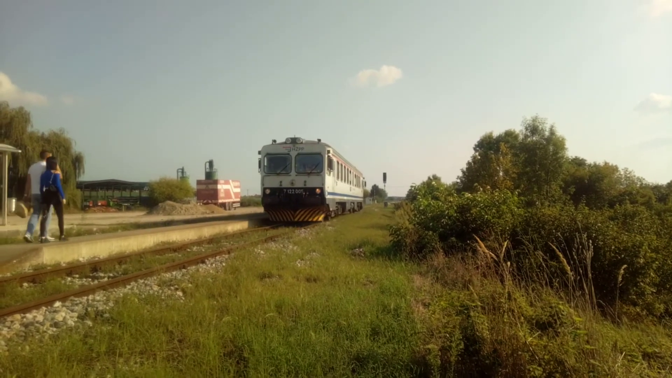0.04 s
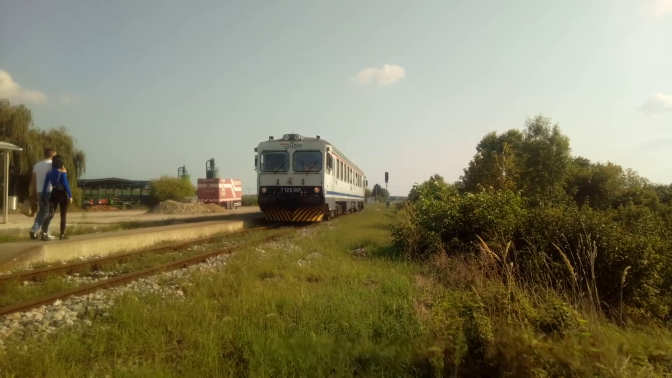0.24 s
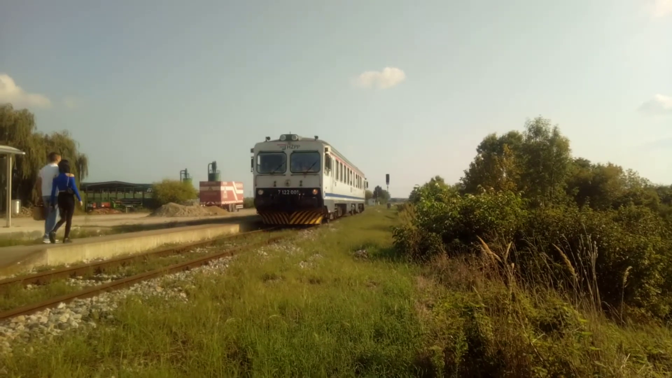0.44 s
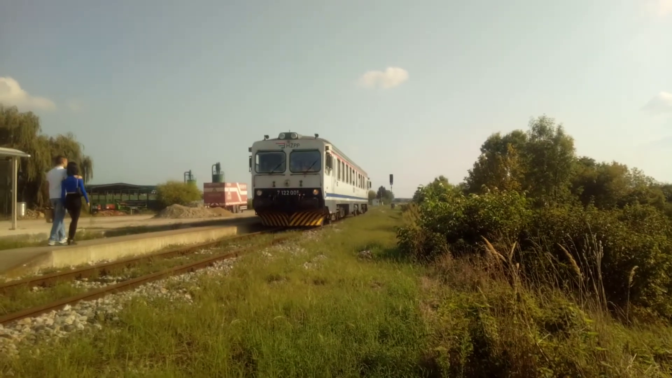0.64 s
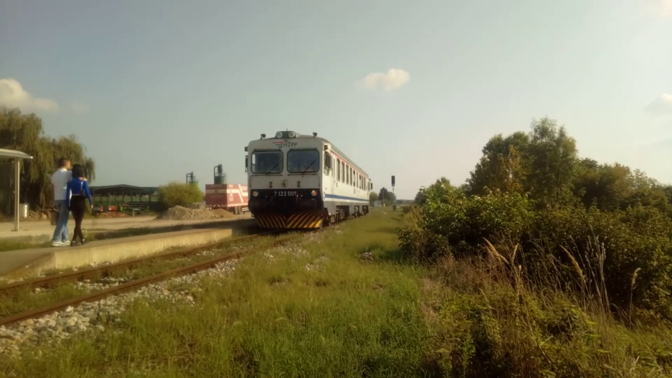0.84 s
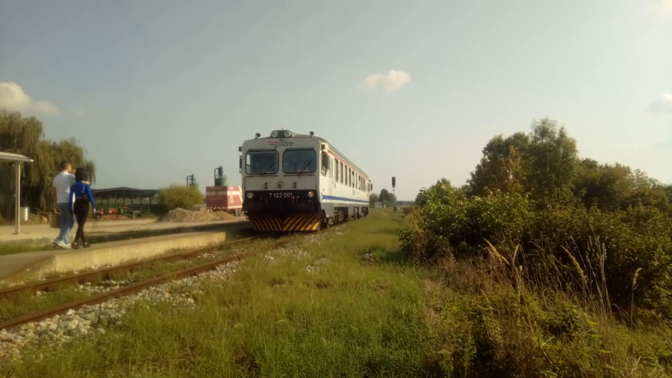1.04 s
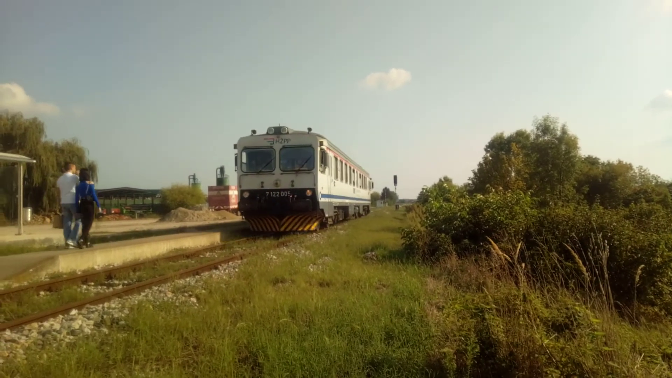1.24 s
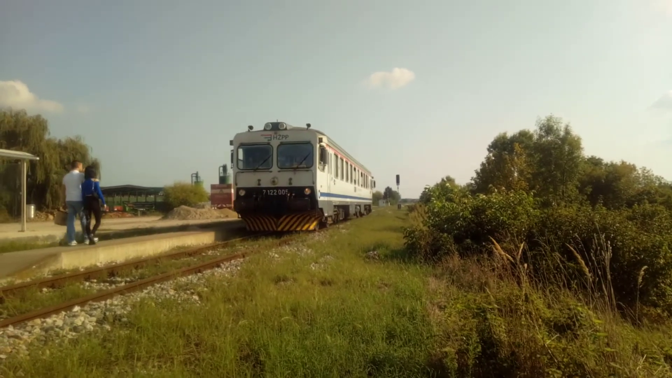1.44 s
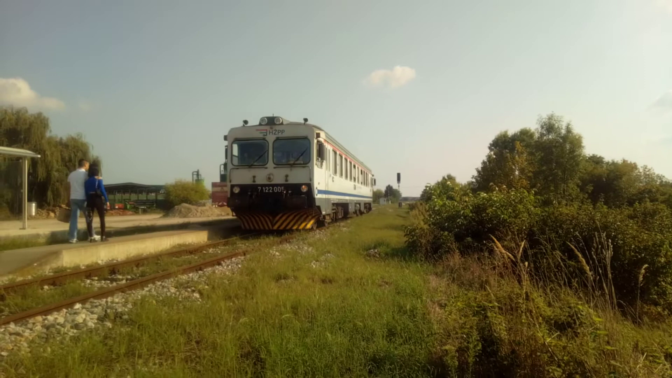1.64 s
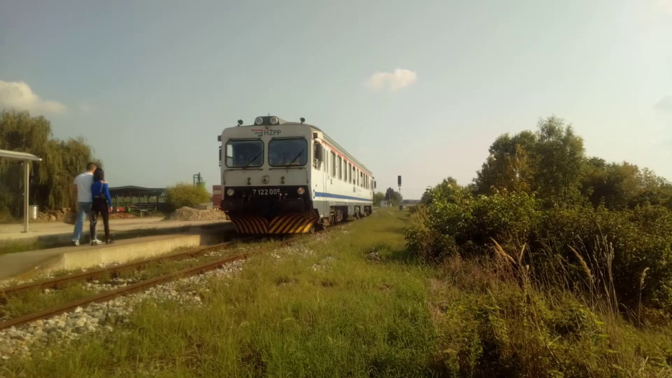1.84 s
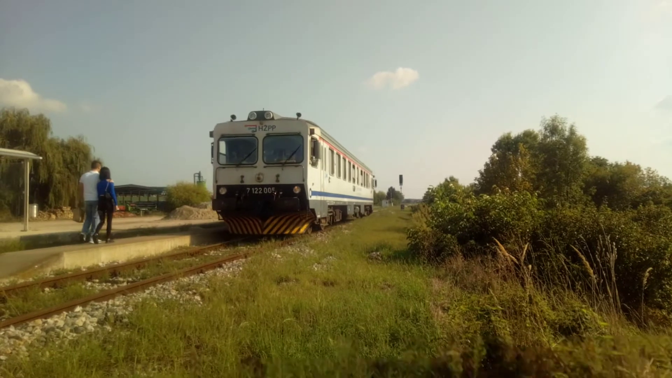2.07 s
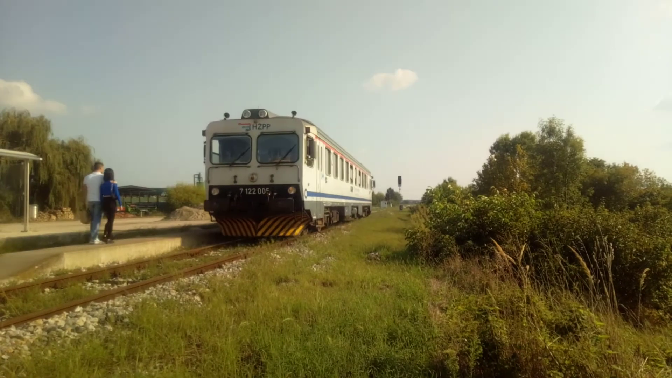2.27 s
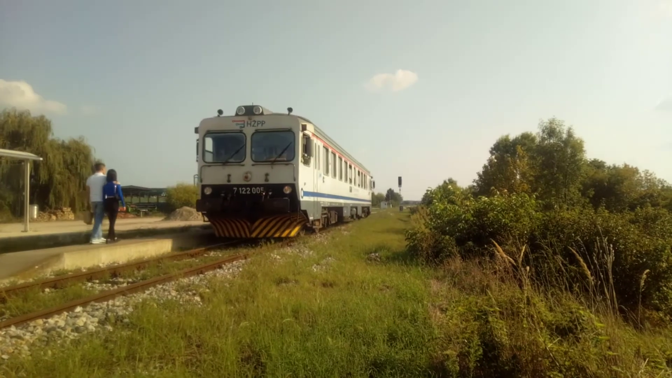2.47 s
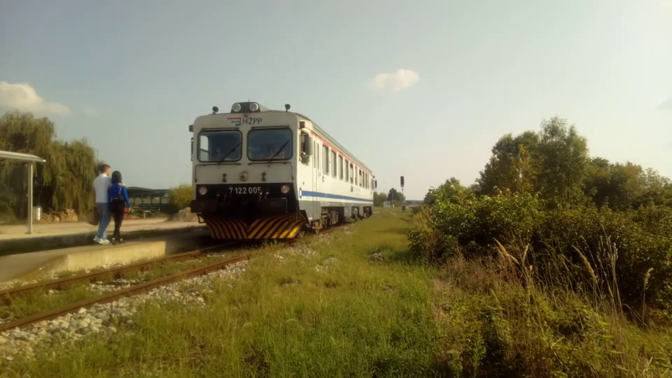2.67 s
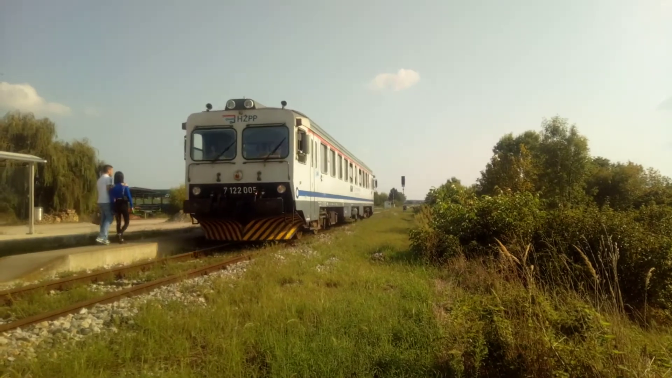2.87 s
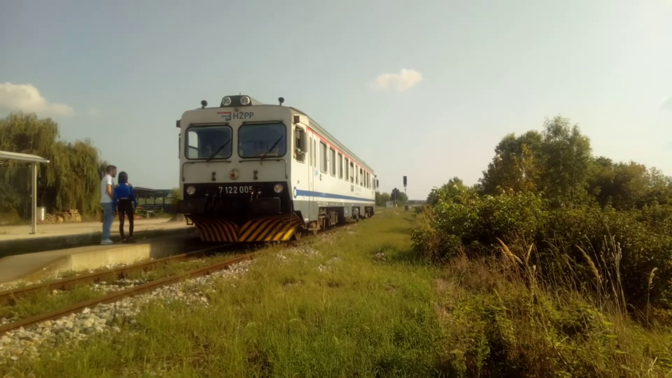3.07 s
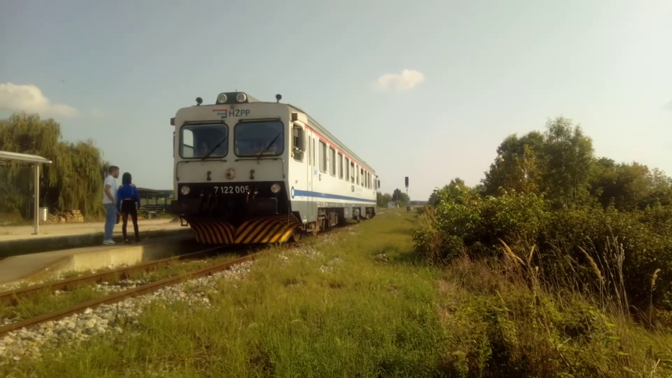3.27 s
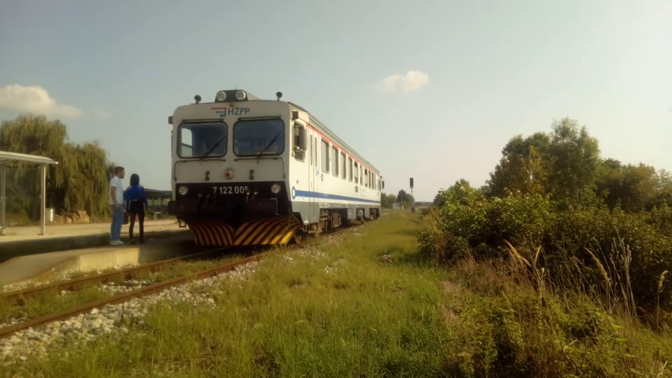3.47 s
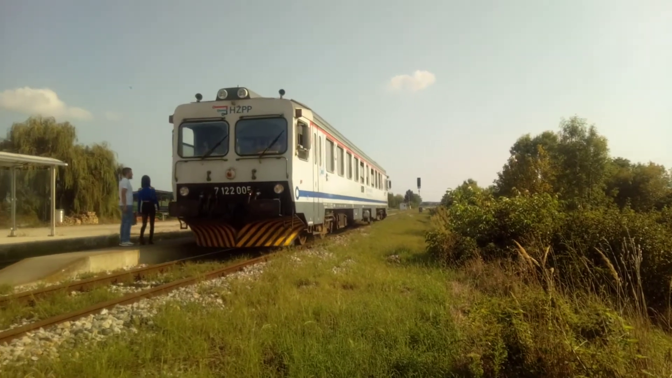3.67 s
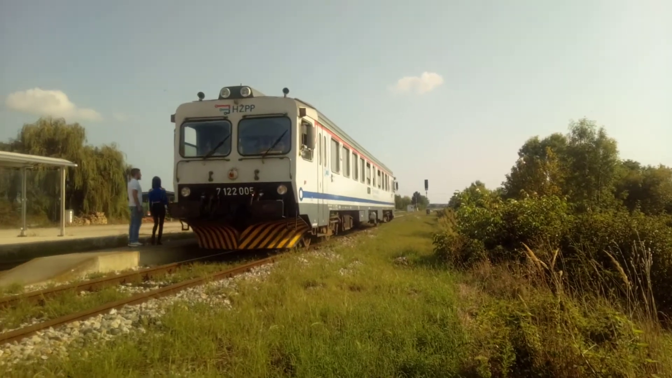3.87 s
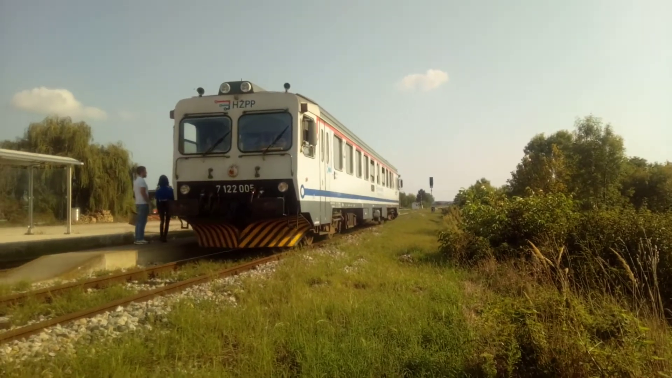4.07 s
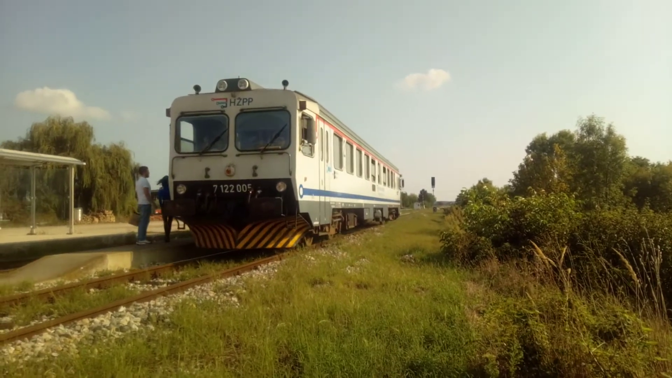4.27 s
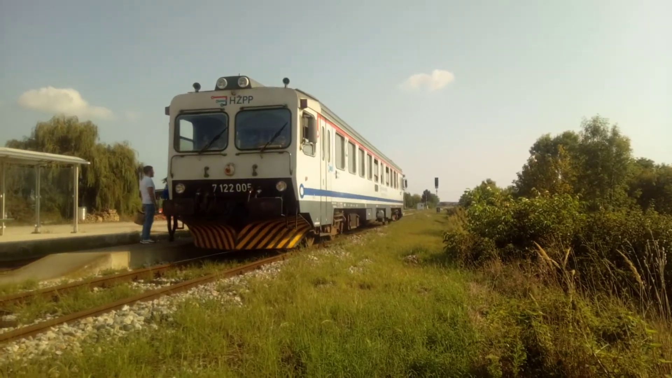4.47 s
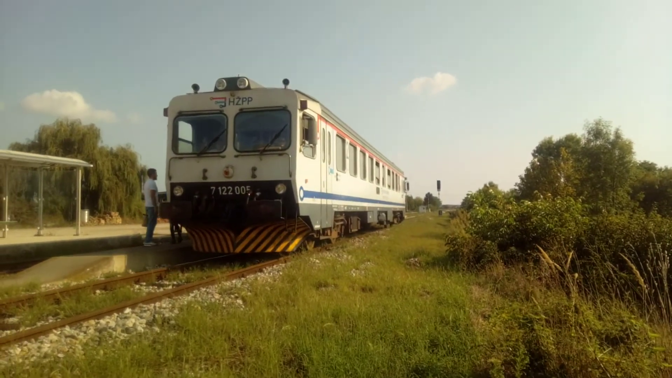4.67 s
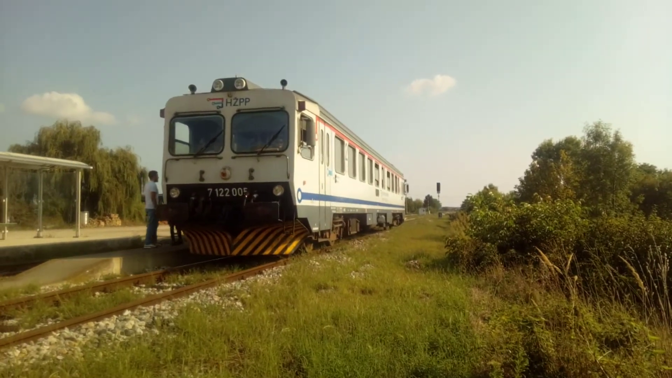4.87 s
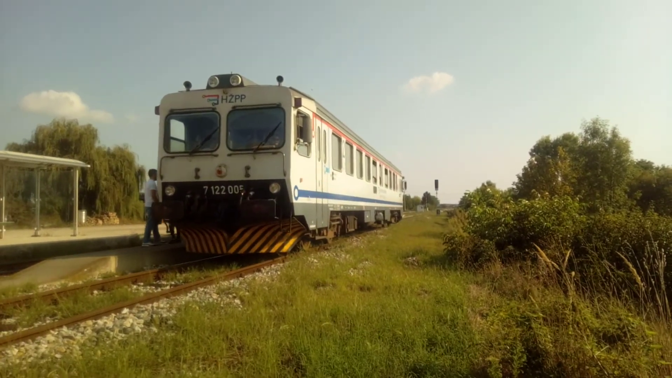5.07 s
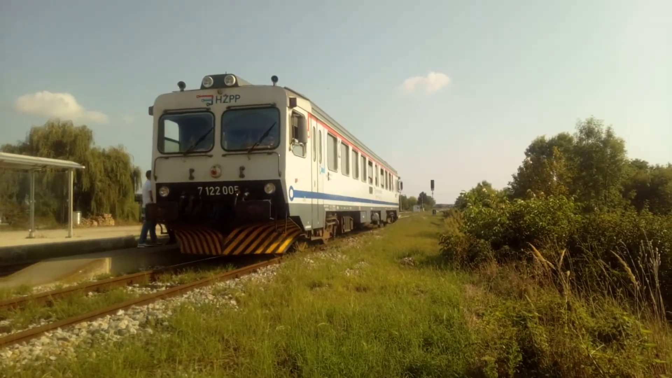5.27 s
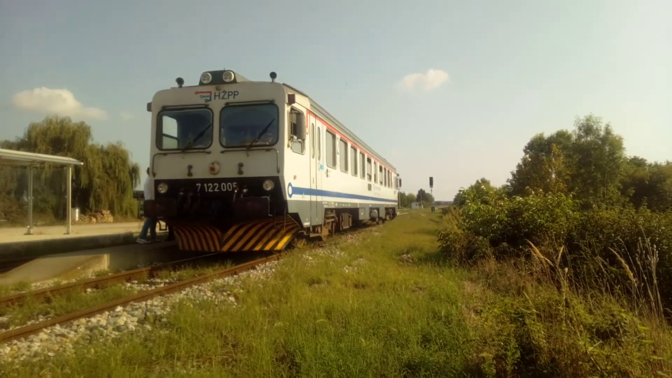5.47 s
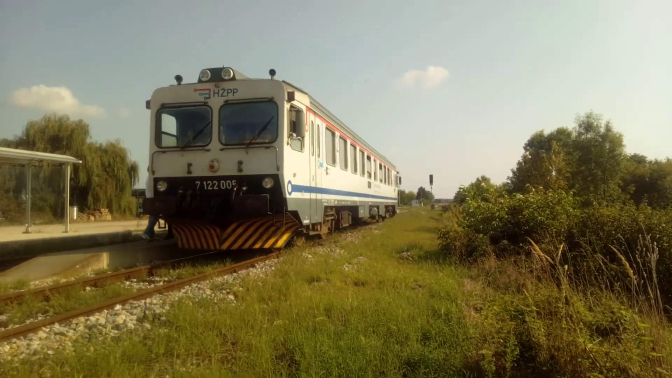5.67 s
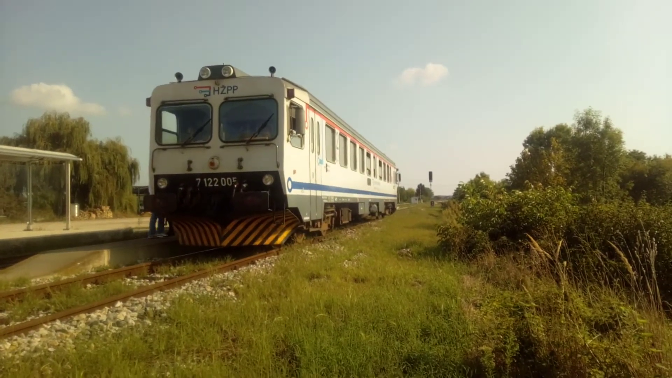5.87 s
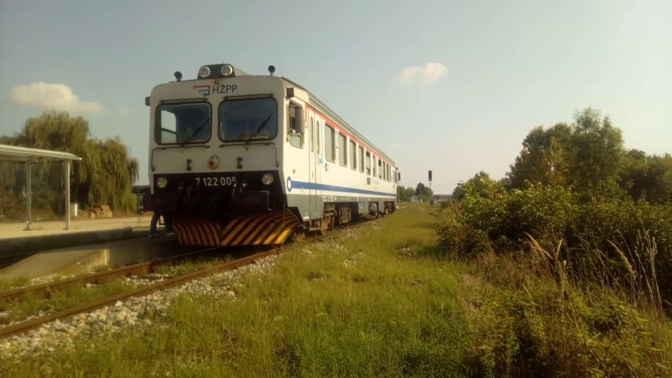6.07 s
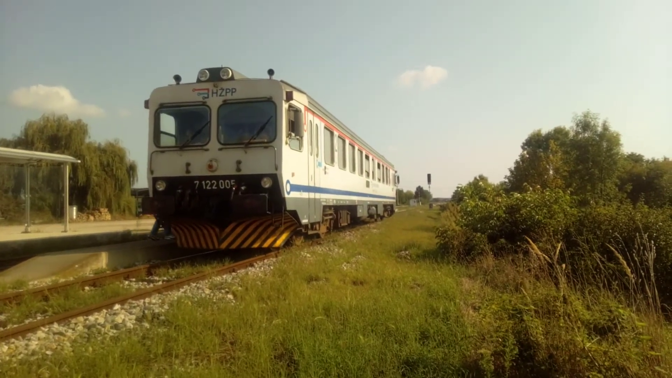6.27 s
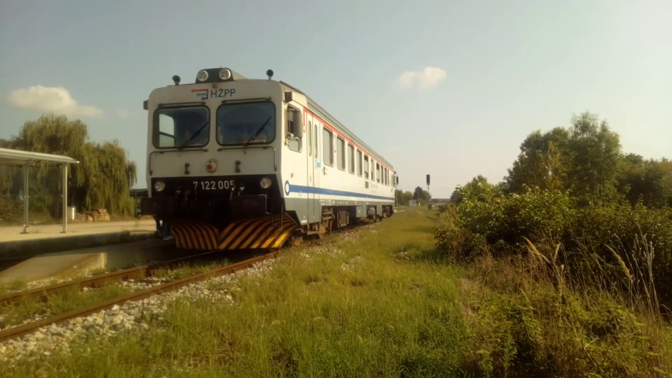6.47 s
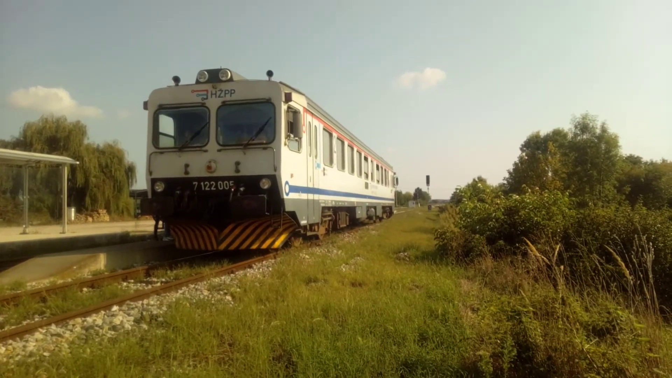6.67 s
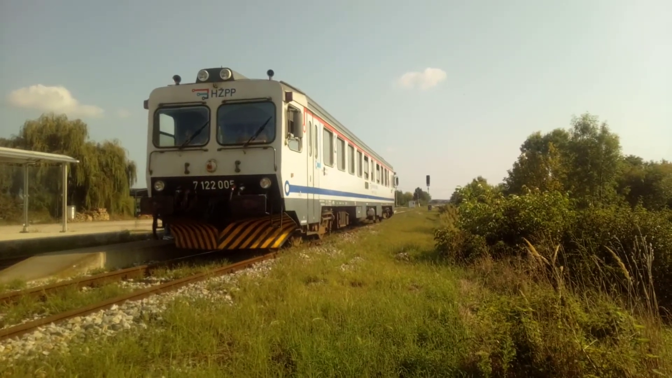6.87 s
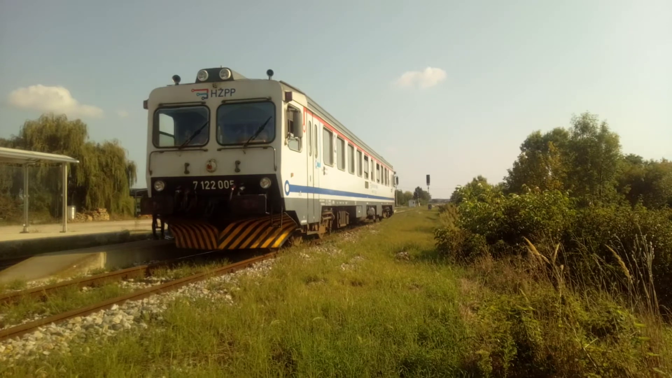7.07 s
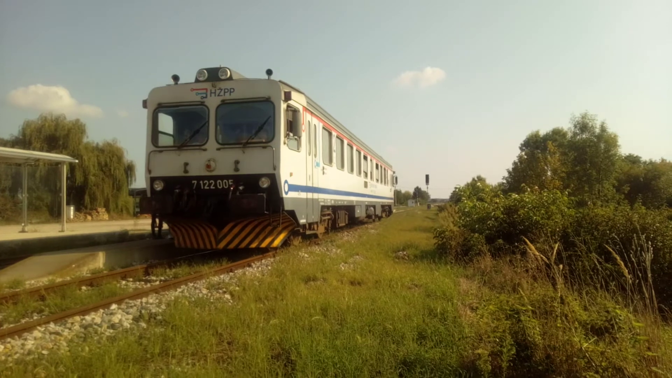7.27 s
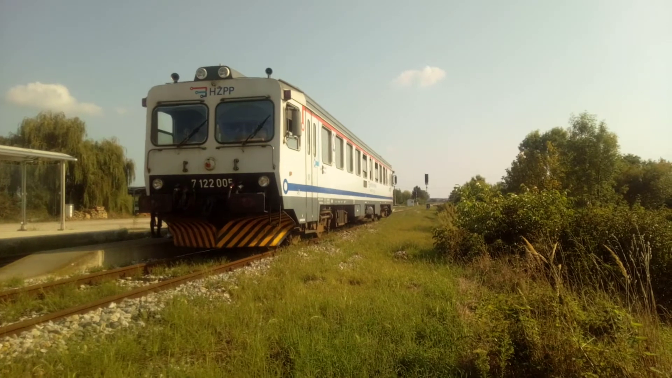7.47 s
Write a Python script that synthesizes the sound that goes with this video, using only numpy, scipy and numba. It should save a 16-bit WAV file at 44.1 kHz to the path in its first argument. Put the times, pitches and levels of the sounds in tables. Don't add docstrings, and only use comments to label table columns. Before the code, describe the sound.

Close trackside hand-held pickup in open air: soft diesel rumble, light brake squeal and scraping, a brief lull with handling knocks, then strong shrill brake screech with bright overtones, rough groans and grit. Around five seconds the wheels stop and the squeal drops away with a faint tail. Brake air sighs out, and a low pulsing engine idle with a steady hum remains.

```python
import sys
import numpy as np
from scipy import signal
from scipy.fft import rfft, irfft, next_fast_len
from scipy.io import wavfile
from scipy.ndimage import uniform_filter1d
from numba import njit

SR = 44100
rng = np.random.default_rng(int(sys.argv[2]) if len(sys.argv) > 2 else 0)


def elevation(decibels):
    levels = np.asarray(decibels, float)
    return 10 ** (levels / 20)


def log_audio(samples):
    frames = np.atleast_2d(samples).T
    limited = np.clip(frames, -1, 1)
    pcm = np.round(limited * 32767).astype(np.int16)
    wavfile.write(sys.argv[1], SR, pcm)


N = 331191
T = np.arange(N) / SR
STOP_S = 5.28


def noise():
    return rng.standard_normal(N)


def curves(table):
    s, *columns = np.transpose(table)
    return [np.interp(T, s, c) for c in columns]


def unit(x):
    return x / np.sqrt(np.mean(x ** 2))


def walk(rate):
    k = int(SR / rate)
    knots = rng.standard_normal(N // k + 2)
    line = np.interp(np.arange(N) / k, np.arange(N // k + 2), knots)
    return 1.203 * uniform_filter1d(line, k)


def bump(s, length):
    return np.exp(-np.log(16) * ((T - s) / length) ** 2)


def power_sum(*dbs):
    return 10 * np.log10(sum(elevation(2 * np.maximum(db, -200)) for db in dbs))


def add(out, at, wave):
    out[at:at + len(wave)] += wave[:N - at]


def shaped(x, points, lo_hz=0, hi_hz=SR, modes=(), modes_db=0):
    n = next_fast_len(N)
    f = np.arange(n // 2 + 1) * SR / n + 1
    points_hz, points_db = np.transpose(points)
    power = elevation(2 * np.interp(np.log(f), np.log(points_hz), points_db))
    for hz, width, db in modes:
        power = power + elevation(2 * (db + modes_db)) / (1 + (2 * (f - hz) / width) ** 2)
    edges = 1 / (1 + (lo_hz / f) ** 12) / (1 + (f / hi_hz) ** 12)
    return irfft(rfft(x, n) * np.sqrt(power * edges), n)[:N]


def ring(start_s, hz, t60, db, turn=0., rise_s=1e-4):
    t = np.arange(int(t60 * SR)) / SR
    decay = 1000 ** (-t / t60) * (1 - np.exp(-t / rise_s))
    return int(start_s * SR), elevation(db) * np.sin(2 * np.pi * (hz * t + turn)) * decay


@njit
def driven(push, hz, width, skirt):
    out, z, w, d, turn = np.empty(len(push)), 0j, 0j, 0., 0j
    for i in range(len(push)):
        if i % 32 == 0:
            d, turn = np.pi * width[i] / SR, np.exp(2j * np.pi * hz[i] / SR)
            size = 2 * np.sqrt(d)
        z = z * (1 - d) * turn + size * push[i]
        w = (w * (1 - skirt * d)) * turn + skirt * d * z
        out[i] = w.imag
    return out


# f/Hz, width/Hz, level/dB
DIPS = [(893, 78, -3.5), (1340, 120, -1.5), (1850, 130, -2), (2865, 147, -5), (3410, 125, -4),
        (4140, 89, 2), (5030, 130, -0.5), (5400, 170, -2), (7530, 110, -1), (8200, 300, -2.5),
        (9400, 250, -4), (10430, 250, -8), (12050, 120, -3), (13950, 350, -4)]


def dipped(x):
    n = next_fast_len(N)
    f = np.arange(n // 2 + 1) * SR / n
    gain_db = sum(db * np.exp(-np.log(16) * ((f - hz) / width) ** 2) for hz, width, db in DIPS)
    return irfft(rfft(x, n) * elevation(gain_db), n)[:N]


# f/Hz, level/dB (per Hz)
FIELD = [(150, -39.5), (250, -8.5), (292, -9.5), (330, -0.5), (367, -19.5), (640, -20.5), (723, -16.5),
         (938, -19), (1530, -17.5), (2620, -25), (4490, -29), (5830, -35), (8120, -53.5), (11900, -53),
         (16000, -30.5)]
# f/Hz, width/Hz, level/dB
FANS = [(640, 18, -10), (1087, 210, -14.5), (1557, 200, -21), (2650, 110, -18.5), (5780, 90, -26),
        (6600, 120, -28), (12100, 300, -39), (14900, 240, -26.5), (7620, 90, -35), (8750, 200, -41),
        (9120, 100, -40), (11750, 150, -36.5), (14650, 100, -29), (6020, 60, -26)]
# f/Hz, level/dB (per Hz)
AIR_COLOUR = [(1180, -39), (2000, -36), (2670, -9.5), (2880, -1), (4340, -10), (4650, -9), (6140, 0.5),
              (8190, -13.5), (15100, -1), (16000, -2.5)]


def outdoors():
    flutter = elevation(0.2 * walk(4.5) + 1.1 * walk(60))
    field = unit(shaped(noise() * flutter, FIELD, lo_hz=560, modes=FANS, modes_db=1.0))
    t = np.clip(T - 5.3, 0, None)
    air_db = -57 - 2.5 * t - 5 * t ** 2 + 7 * np.exp(-t / .06)
    air = unit(shaped(noise(), AIR_COLOUR, modes=FANS[3:], modes_db=23.0)) * np.clip(t / 0.089, 0, 1)
    return elevation(-52.5) * field + elevation(air_db + 10) * air


# t/s, level/dB (under full)
PRESSURE = [(0, -51), (.44, -51), (.54, -21), (.93, -25), (.98, -15.5), (1.5, -15.5), (1.85, -9.5),
            (1.93, -22.5), (2.06, -42), (2.32, -40), (2.42, -7), (2.55, -3.5), (2.7, -1), (3.4, 1.5),
            (4.5, 0), (5.25, 1), (5.36, -18.5), (5.5, -29), (5.7, -39), (6, -47.5)]
# f/Hz, level/dB (per Hz)
EXHAUST = [(12, -56), (20, -18), (48, -9.5), (75, -0.5), (91, -5), (118, -3.5), (137, -6.5), (155, -5.5),
           (184, -6.5), (211, -5.5), (300, -20), (390, -56), (660, -120)]
# f/Hz, level/dB (per Hz)
CASING = [(250, 1.5), (340, -7), (420, -13), (600, -9)]
# f/Hz, width/Hz, level/dB
HUM = [
    (79.5, 8.6, -50.5),
    (152.6, 5, -51),
]
UNLOAD_DB = (-2, 1, -1.5)
# start t/s, f/Hz, level/dB
PUMP = (5.45, 328.4, -62)


def engine(duck):
    held = uniform_filter1d(elevation(curves(PRESSURE)[0]), SR // 5)
    exhaust_db, casing_db, ground_db = (
        db + less * held + 0.4 * walk(2.96) for db, less in zip((-49, -59, -51.5), UNLOAD_DB))
    ground_db = ground_db - 3 * np.clip(1 - T / 1.3, 0, 1)
    ground_db = ground_db - 4 * np.clip((T - STOP_S) / 0.22, 0, 1)
    ground_db = ground_db - 1 * np.clip(T - STOP_S, 0, None)
    low, high = (
        elevation(db + 50.0 + 1.9 * walk(6.5)) * np.sin(2 * np.pi * np.cumsum(hz + width * walk(10)) / SR)
        for hz, width, db in HUM)
    exhaust = 0.98 * unit(shaped(noise() * elevation(1.4 * walk(12)), EXHAUST, 91, 297)) + high
    ground = 1.37 * unit(shaped(noise() * elevation(1.4 * walk(6.1)), EXHAUST, hi_hz=90)) + low
    casing = unit(shaped(noise() * elevation(2.5 * walk(21) + 2.5 * walk(8)), CASING, 285, 550))
    start_s, hz, db = PUMP
    pump = elevation(db + 4.0 + 0.9 * walk(6)) * np.sin(2 * np.pi * hz * T + 0.3 * walk(8.9))
    pump = pump * np.clip((T - start_s) / 0.16, 0, 1)
    engine_air = elevation(exhaust_db) * duck ** 0.22 * exhaust + elevation(casing_db) * duck ** 1.1 * casing
    return engine_air + elevation(ground_db) * ground + pump


# t/s, peak level/dB, bright part level/dB (under the peak)
TICKS = [(0.1956, -31.5, -9), (0.2277, -32, -5.5), (0.2322, -33.5, -12), (0.2378, -41, -11),
         (0.2411, -40, -9), (0.2473, -39.5, -11), (1.994, -26, -5), (1.9987, -30, -12), (2.0028, -35, -10),
         (2.0262, -35, -13), (2.0282, -31.5, -11), (5.527, -32, -16), (5.5322, -35.5, -16),
         (5.545, -42, -18), (5.5605, -29, -4), (5.5612, -25.5, -18), (5.5625, -25.5, -20),
         (5.565, -31.5, -20), (7.4795, -38, -14), (7.432, -46.5, 0)]
# f/Hz, t60/s, level/dB
CASE = [(1400, .007, -1), (2100, .005, -2), (2800, .005, -2), (3600, .005, 0), (5200, .004, -6)]
# f/Hz, t60/s, level/dB
CASE_BRIGHT = [(9900, .004, 0), (11800, .003, -5), (7800, .003, -6), (15200, .003, -5)]
# t/s, peak level/dB, f/Hz, t60/s
BUMPS = [
    (1.152, -28.5, 206, 0.07),
    (1.159, -22.5, 260, 0.038),
    (1.165, -28.5, 109, 0.17),
    (1.994, -23.5, 129, 0.18),
    (2.004, -23, 254, 0.1),
    (2.029, -30, 264, .1),
    (7.478, -31, 3300, .008),
    (7.4785, -31, 2100, .012),
]


def handling():
    out = np.zeros(N)
    chances = rng.standard_normal((len(TICKS), len(CASE + CASE_BRIGHT), 3))
    for (s, db, bright_db), chance in zip(TICKS, chances):
        modes = CASE + [(hz, t60, mode_db + bright_db) for hz, t60, mode_db in CASE_BRIGHT]
        for (hz, t60, mode_db), (detune, turn, size) in zip(modes, chance):
            level_db = db + mode_db + 4.5 + 2 * size
            add(out, *ring(s, hz * (1 + detune / 30), t60, level_db, turn, rise_s=0.00063))
    for s, db, hz, t60 in BUMPS:
        add(out, *ring(s, hz, t60, db))
    return out


# t/s, length/s, low f/Hz, high f/Hz, level/dB
SCRAPES = [
    (1.135, 0.13, 140, 1000, -46),
    (2.01, 0.091, 100, 350, -45),
    (7.43, 0.12, 220, 3900, -49.5),
    (3.83, 0.077, 27, 190, -46),
    (6.53, .04, 4600, 5200, -61),
]


def scrapes():
    out = np.zeros(N)
    for s, length, lo_hz, hi_hz, db in SCRAPES:
        t = np.linspace(0, 1, int(length * SR))
        band = signal.butter(2, (lo_hz, hi_hz), "band", fs=SR, output="sos")
        brush = signal.sosfilt(band, rng.standard_normal(len(t)))
        add(out, int(s * SR), elevation(db + 8.0) * unit(brush) * t ** 0.36 * (1 - t))
    return out


# f/Hz, level/dB (per Hz)
GRIND_BED = [(400, -52.5), (720, -27.5), (890, -44), (1320, -29.5), (2000, -23.5), (3000, -24), (4000, -21),
             (5000, -25), (6500, -19.5), (7500, -29.5), (8500, -38), (11000, -39), (14250, -41),
             (15700, -31.5)]
# f/Hz, width/Hz, level/dB
WHEEL = [(770, 69, -32), (984, 18.4, -21.5), (1060, 85, -24.5), (1137, 94, -31.5), (1558, 42, -30.5),
         (2614, 55, -24), (3570, 270, -30), (4820, 116, -26.5), (5190, 44, -29), (5564, 90, -30),
         (6270, 17, -26.5), (7150, 58, -46), (7770, 100, -34), (8560, 27, -49), (9700, 89, -43.5),
         (9900, 107, -41), (10800, 38, -47), (12150, 48, -40), (14540, 50, -31), (14600, 140, -28),
         (15020, 80, -29), (7900, 39, -33), (9640, 60, -43.5), (10650, 40, -39.5), (12300, 60, -43),
         (8720, 50, -39.5), (15250, 200, -38), (3124, 87, -30.5)]
# middle t/s, length/s, level/dB, web level/dB (under tread)
PATCHES = [(2.25, 0.24, -66, 12), (2.684, 0.12, -38, -22), (2.92, 0.38, -30.5, -13),
           (3.04, .07, -37.5, -4.5), (3.24, 0.17, -42, -20), (3.456, 0.27, -34.5, -9.5),
           (3.975, 0.41, -32, -10.5), (4.14, 0.078, -36.5, -11), (4.514, 0.18, -54, 6.5),
           (4.66, 0.21, -40, 0.5), (4.82, 0.25, -31.5, -9.5), (5.026, 0.22, -31.5, -7.5)]
# low f/Hz, high f/Hz, dragging level/dB, dB per pressure dB, patch level/dB
PARTS = [
    (646, 1120, -51.5, 0.7, -0.5),
    (1336, 3500, -45, 0.5, -0.7),
    (4540, 10000, -45.5, 0.68, -5.5),
    (8330, 20000, -46, 0.9, -6.5),
]


def grind():
    pressure_db, = curves(PRESSURE)
    swells = [(bump(s, length) * elevation(db), elevation(web_db)) for s, length, db, web_db in PATCHES]
    tread = sum(a ** 2 for a, _ in swells)
    web = sum((a * w) ** 2 for a, w in swells)
    rolling = np.clip((STOP_S - T) / .3, 0, 1)
    grit = elevation(1.8 * walk(300) + 1.65 * walk(30.1))
    bed = unit(shaped(noise() * grit, GRIND_BED))
    for hz, width, db in WHEEL:
        ringing = driven(noise() * grit, hz * (1 + 0.0066 * walk(5)), width + 0. * T, 3.8)
        bed = bed + np.sqrt(width) * elevation(db - 7.5 + 3.0 * walk(11)) * ringing
    flat = [(1, 0), (SR, 0)]
    out = elevation(-51.5) * rolling * unit(shaped(noise() * grit, FIELD, 570, 6300))
    for (lo_hz, hi_hz, drag_db, law, patch_db), patch in zip(PARTS, (web, tread, tread, tread)):
        power = elevation(2 * (drag_db + law * pressure_db)) + elevation(2 * patch_db) * patch
        out = out + np.sqrt(power) * unit(shaped(bed, flat, lo_hz, hi_hz))
    return out


# middle t/s, length/s, f/Hz,
# width/Hz, level/dB
RASPS = [(2.83, 0.19, 3720, 99, -37), (2.97, 0.063, 3680, 110, -34), (3.0, 0.13, 2500, 120, -34.5),
         (2.85, 0.22, 2900, 64, -47), (3.55, .1, 2650, 90, -41), (3.64, 0.42, 2400, 60, -41),
         (3.53, .2, 3100, 120, -46), (3.92, 0.13, 1900, 110, -40), (4.12, .1, 2660, 93, -40.5),
         (4.3, .15, 3160, 150, -41.5), (4.05, .15, 3400, 100, -46), (1.2, .05, 2110, 70, -52),
         (1.18, .07, 2500, 90, -54), (1.4, .05, 2130, 120, -51), (1.1, .5, 2670, 38, -55),
         (1.32, .15, 3140, 90, -57), (1.84, 0.21, 2210, 70, -49), (4.95, .08, 3800, 60, -42),
         (5.09, .05, 3300, 70, -44), (3.9, 0.32, 1125, 110, -46), (2.79, 0.18, 760, 82, -49),
         (4.43, 0.28, 2230, 80, -42), (4.75, 0.17, 3350, 170, -38.5), (4.72, 0.12, 2900, 110, -39.5),
         (5.2, .15, 765, 65, -51.5), (3.02, .1, 775, 62, -44.5), (3.95, .3, 985, 37, -42.5),
         (5.08, .12, 725, 47, -43.5), (5.31, 0.16, 670, 37, -49.5), (3.2, 0.056, 720, 50, -50),
         (4.35, .12, 4300, 250, -42), (5.02, .1, 5225, 50, -41), (4.57, .12, 1120, 130, -43),
         (4.2, .07, 1060, 130, -45.5), (5.06, .12, 1540, 70, -43.5), (4.78, .1, 1470, 60, -47.5),
         (5.26, 0.069, 1140, 90, -46), (1.35, .85, 4410, 420, -46.5), (0.66, 0.36, 4470, 330, -53)]


def rasps():
    rim_db = -53 + .55 * curves(PRESSURE)[0] + 2 * walk(11.9)
    out = elevation(rim_db) * driven(noise(), 14705 + 0. * T, 60 + 0. * T, 4.)
    push = noise()
    for s, length, hz, width, db in RASPS:
        near = slice(int((s - 1.5 * length) * SR), int((s + 1.5 * length) * SR))
        shaken = driven(push[near], hz + 0. * T[near], width + 0. * T[near], 3.6)
        add(out, near.start, elevation(db) * bump(s, length)[near] * shaken)
    return out


# t/s, length/s, f/Hz, level/dB
GROANS = [(4.5, 0.16, 3350, -47.5), (4.95, 0.12, 800, -46), (5.225, .03, 3350, -44),
          (5.186, .022, 2225, -37), (4.86, 0.038, 2250, -41), (4.96, .03, 1590, -39), (4.47, .02, 470, -54),
          (4.79, .1, 6120, -44.5), (4.425, .06, 1180, -47), (4.6, .05, 1040, -38.5),
          (4.9, 0.064, 1040, -39.5), (4.99, .055, 775, -38), (4.965, .09, 2659, -31.5),
          (4.96, .045, 5240, -39), (5.02, .05, 5215, -39), (4.96, .065, 3558, -37), (5.0, .045, 1560, -37),
          (4.97, .08, 6234, -38), (5.25, .08, 6126, -44), (5.12, .15, 990, -42), (5.24, .07, 665, -49),
          (4.475, .014, 540, -48), (3.4, 0.15, 800, -56), (4.33, .055, 1320, -52), (4.97, .06, 3200, -46),
          (5.27, .03, 3800, -52), (4.6, 0.18, 3600, -46)]


def groans():
    out, drift = np.zeros(N), walk(40)
    for s, length, hz, db in GROANS:
        t = np.arange(int(1.71 * length * SR)) / SR
        at = int((s - .37 * length) * SR)
        wobble = drift[int(rng.random() * N / 2):][:len(t)]
        swell = elevation(db + 5 + 3.5 * wobble) * np.sin(np.pi * t / t[-1]) ** 2
        add(out, at, swell * np.sin(2 * np.pi * hz * t + 1.44 * wobble))
    return out


# t/s, level/dB, length/s
DRAG_SLIPS = [(0.549, -4.5, 0.066), (0.551, -9, 0.012), (0.567, 7.5, 0.012), (0.665, -7, 0.028),
              (0.758, -4, 0.016), (0.783, -7, 0.06), (0.794, 5, 0.02), (0.833, -12, 0.022),
              (0.955, -3.5, 0.084), (1.103, -8, 0.014), (1.137, 4, 0.018), (1.166, -9, 0.012),
              (1.18, 5, 0.012), (1.207, -4.5, 0.016), (1.232, 4.5, 0.016), (1.265, -9.0, 0.08),
              (1.293, 4.5, 0.016), (1.337, -10, 0.012), (1.36, 7, 0.022), (1.403, -7, 0.012),
              (1.414, 8, 0.012), (1.423, -10, 0.054), (1.47, 5, 0.012), (1.502, -5, 0.012),
              (1.527, 5, 0.016), (1.578, -4, 0.012), (1.664, -9, 0.014), (1.724, -14, 0.011),
              (1.74, 4, 0.04), (1.788, -2, 0.016), (1.849, -9.5, 0.034), (1.89, -11, 0.012),
              (1.932, -8, 0.012), (1.98, -8, 0.036), (2.111, -3, 0.056), (2.204, -6, 0.08),
              (2.239, 7, 0.012), (2.255, -4, 0.012), (2.332, -8.5, 0.075), (2.41, -9, 0.012)]
# t/s, level/dB, length/s
SLIPS = [(2.423, -13, 0.011), (2.471, -7.5, 0.015), (2.535, -5, 0.011), (2.545, -9, 0.05), (2.58, 5, 0.02),
         (2.612, -9, 0.024), (2.7, -4, 0.012), (2.72, 6, 0.018), (2.737, -14.0, 0.01), (2.8, -6, 0.012),
         (2.815, -4, 0.01), (2.85, -9, 0.016), (2.882, -6, 0.011), (2.915, -16, 0.013), (2.975, -14, 0.016),
         (3, 8, 0.016), (3.027, -12, 0.079), (3.04, 11, 0.011), (3.136, -10.5, 0.069),
         (3.214, -14.5, 0.011), (3.269, -11, 0.014), (3.27, -4.5, 0.069), (3.292, 4.5, 0.016),
         (3.327, -4.5, 0.045), (3.376, -12.5, 0.012), (3.436, -12.0, 0.081), (3.442, 5, 0.012),
         (3.459, -19.5, 0.015), (3.56, -8, 0.024), (3.592, 4, 0.016), (3.6, -9, 0.065), (3.614, -11, 0.012),
         (3.724, -21.5, 0.028), (3.773, -6.5, 0.03), (3.826, -10, 0.024), (3.86, 6.0, 0.022),
         (3.872, -12.0, 0.086), (3.889, -7, 0.012), (3.957, -4, 0.014), (3.986, 6.5, 0.018),
         (4.016, -9.5, 0.089), (4.125, -5.5, 0.043), (4.24, -4, 0.071), (4.31, -2.5, 0.03),
         (4.354, 5.5, 0.025), (4.374, -8.5, 0.082), (4.497, -7.5, 0.055), (4.502, 8.5, 0.011),
         (4.544, -13, 0.012), (4.612, 6.5, 0.02), (4.616, -9.5, 0.073), (4.636, -7, 0.012),
         (4.72, -3.5, 0.038), (4.811, -12.5, 0.029), (4.89, -2.5, 0.06), (4.954, 7.5, 0.011),
         (4.973, -11.5, 0.078), (5.045, -4.0, 0.022), (5.182, -4, 0.07), (5.287, -7.5, 0.021)]
# t/s, level/dB, length/s
MORE_SLIPS = [(4.192, -4.5, 0.011), (4.48, -7.5, .013), (4.912, -7, 0.013), (5.095, 3, 0.03),
              (5.137, -3, 0.0091), (5.186, -6, 0.0098), (5.307, -14, 0.019), (5.449, -14, .032),
              (5.59, -8, .015)]


def slips():
    out = np.zeros(N)
    for s, db, length in DRAG_SLIPS + SLIPS + MORE_SLIPS:
        add(out, int((s - length) * SR), db * np.bartlett(int(2 * length * SR)))
    return uniform_filter1d(out, int(0.0054 * SR))


# t/s, level/dB
SQUEAL = [(0, -55.5), (.46, -55.5), (.57, -39.5), (.85, -40), (1.17, -29.5), (1.9, -32.5), (2.0, -41.5),
          (2.12, -48.5), (2.4, -33.5), (2.44, -24.5), (2.77, -18.5), (3.08, -20.5), (3.36, -16), (4.2, -14),
          (4.5, -22.5), (4.68, -13.5), (5.0, -19), (5.27, -18.5)]
# t/s, level/dB, fade/(dB/s)
AFTER_RING = [
    (5.336, -31, 190),
    (5.47, -54.5, 44),
]
# t/s, f/Hz
PITCH = [(0, 4480), (.6, 4492), (1.6, 4484), (1.8, 4456), (2.3, 4468), (2.8, 4460), (3.25, 4450),
         (7.6, 4449)]
# middle t/s, length/s, octave level/dB, twelfth level/dB
FLARES = [(2.13, .25, -7, -9), (2.424, 0.067, -1, 9), (2.676, 0.14, 7, 10), (3.34, 0.036, 5.5, -1),
          (3.85, 0.16, 6, 7), (4.673, 0.057, 6, 2), (4.782, .05, -0.5, 7), (4.865, 0.096, 7.5, 16),
          (4.983, 0.061, 7, 14), (5.096, .03, -2, 7), (5.168, 0.055, 12, -2), (5.22, .05, 1, 14)]
# overtone number, level/dB (under the third)
ODD = [
    (5, -17),
    (7, -4.5),
]


def squeal():
    let_go = 422
    pressure_db = curves(PRESSURE)[0]
    held_db = curves(SQUEAL)[0] - let_go * np.clip(T - STOP_S, 0, 1)
    rings = [db - np.where(T > s, fade, -let_go) * (T - s) for s, db, fade in AFTER_RING]
    main_db = power_sum(held_db, *rings) + slips()
    grip = 1 - np.exp(-np.clip(T - 2.2, 0, None) / 1)
    caught = 1 - np.exp(-np.clip(T - 2.3, 0, None) / 0.2)
    lock = 0.74 + (0.96 - 0.74) * caught
    width = 27 + (11.3 - 27) * grip
    second_db = -12 + (-25 + 12) * caught
    wander = 13 + (3.5 - 13) * caught
    hz, second_hz = curves(PITCH)[0], 4490
    flare_octave = sum(db * bump(s, length) for s, length, db, _ in FLARES)
    flare_twelfth = sum(db * bump(s, length) for s, length, _, db in FLARES)
    octave_db = -45 + 0.57 * pressure_db + 0.22 * (main_db + 27.5) + flare_octave + 1.6 * walk(14)
    twelfth_db = -46.5 + 0.78 * pressure_db + 0.19 * (main_db + 21.0) + flare_twelfth + 1.6 * walk(12)
    odd_db = pressure_db - 38.5 + 2.26 * walk(12)
    lowest_db = pressure_db - 39 + 1.8 * walk(12)

    def overtone(k, db, widen, steady, skirt):
        share = np.clip(lock * steady, 0, 1)
        locked = np.sqrt(2) * np.sin(np.pi * k * np.cumsum(hz + wander * walk(32)) / SR)
        loose = driven(noise(), hz * k / 2, width * widen, skirt)
        first = np.sqrt(share) * locked + np.sqrt(1 - share) * loose
        second = driven(noise(), second_hz * k / 2 + 0 * T, width * widen, skirt)
        return elevation(db) * (first + elevation(second_db) * second) / np.sqrt(1 + elevation(2 * second_db))

    out = overtone(2, main_db + 0.52, 1.8, 0.97, 13.0)
    out += overtone(4, octave_db, 1.86, 0.46, 6.0)
    out += overtone(6, twelfth_db, 2.5, 0.64, 8.2)
    out += overtone(1, lowest_db, 6.6, 0.085, 4.7)
    out += overtone(3, odd_db, 4.7, 0.12, 5.1)
    for k, db in ODD:
        out += overtone(k, odd_db + db + .4 * pressure_db, 6.5, .2, 4.)
    return out


def scene():
    brakes = squeal() + dipped(grind()) + groans() + rasps()
    t = np.arange(SR // 2) / SR
    tail = rng.standard_normal(len(t)) * 1000 ** (-t / 0.67) * elevation(-60)
    echo = signal.fftconvolve(brakes, tail)[:N]
    loud = np.sqrt(uniform_filter1d(brakes ** 2, int(.06 * SR)).clip(0))
    duck = 1 / (1 + loud / elevation(-20.5))
    background = engine(duck) + duck ** .5 * dipped(outdoors())
    return (brakes + echo + background + handling() + scrapes())[None]


def roll_off(x):
    return signal.sosfilt(signal.butter(12, 15730, fs=SR, output="sos"), x)


def record(dry):
    return roll_off(dry)


dry = scene()
out = record(dry)
log_audio(out)
```